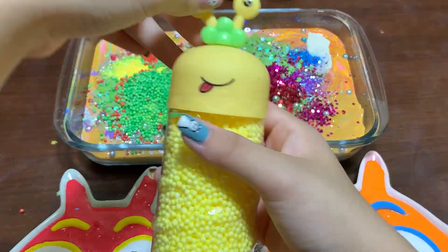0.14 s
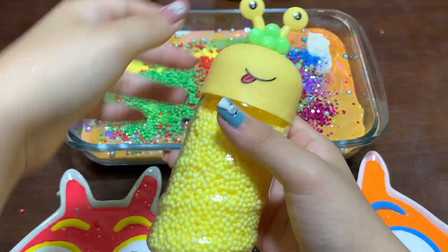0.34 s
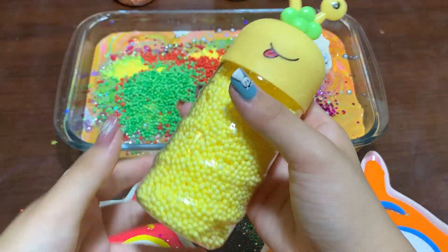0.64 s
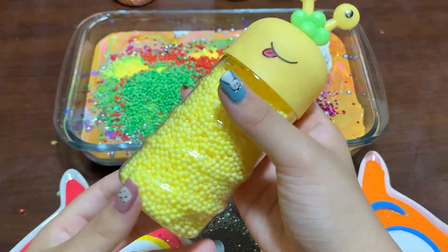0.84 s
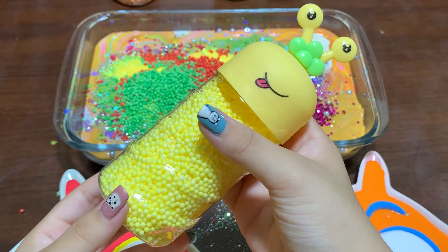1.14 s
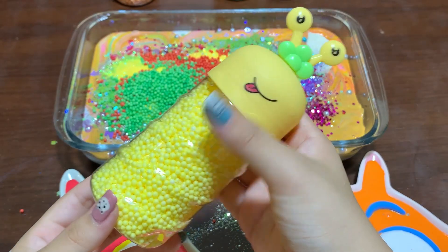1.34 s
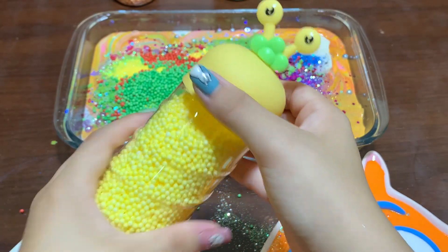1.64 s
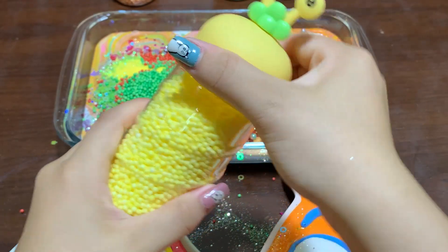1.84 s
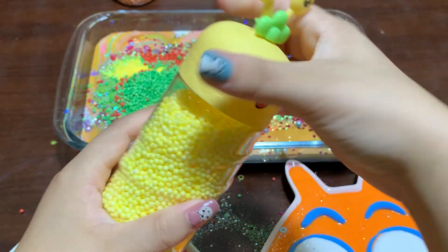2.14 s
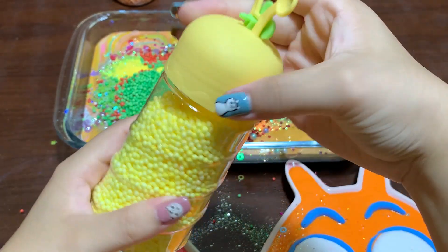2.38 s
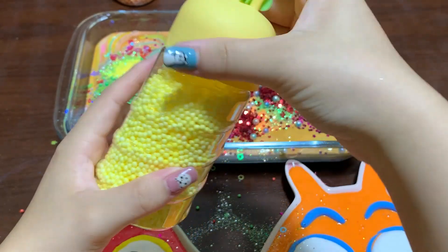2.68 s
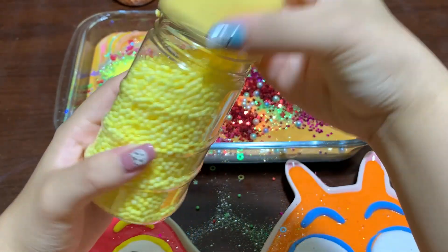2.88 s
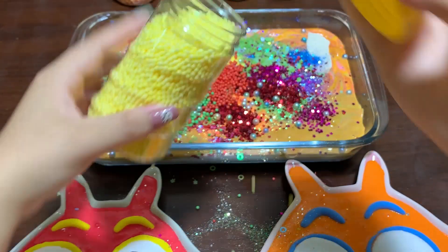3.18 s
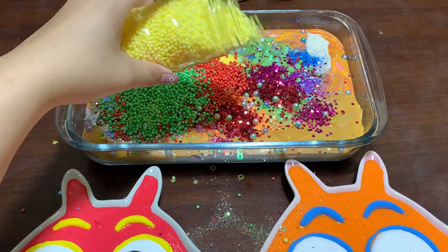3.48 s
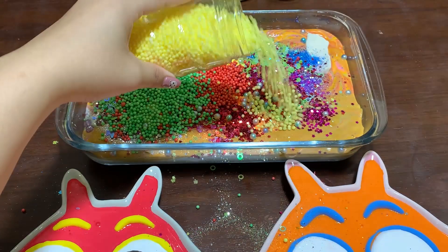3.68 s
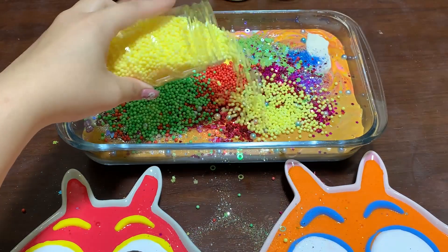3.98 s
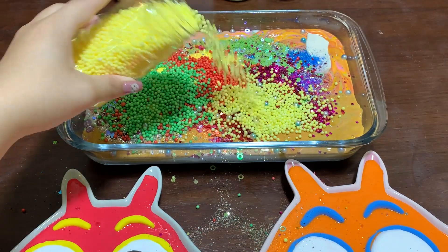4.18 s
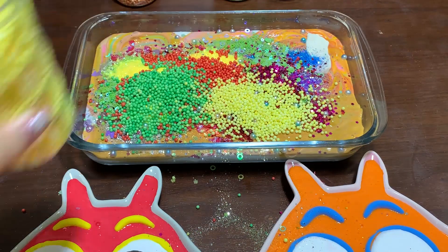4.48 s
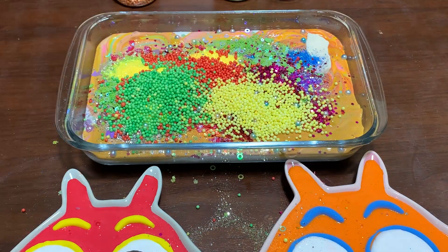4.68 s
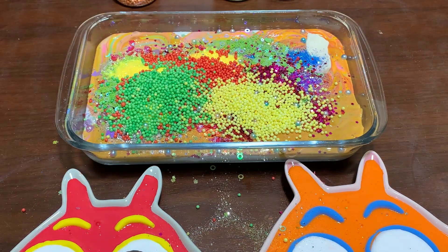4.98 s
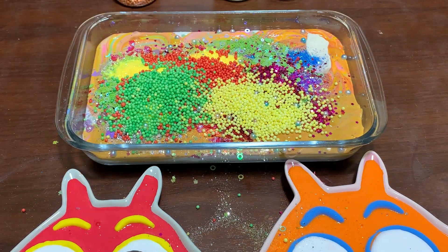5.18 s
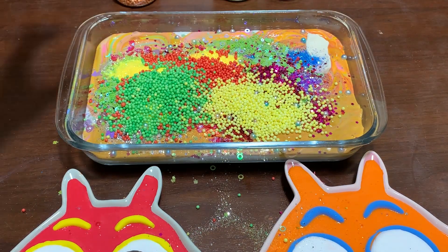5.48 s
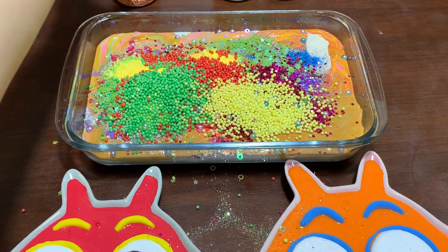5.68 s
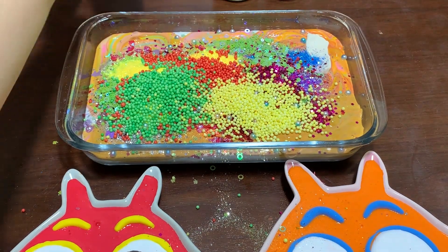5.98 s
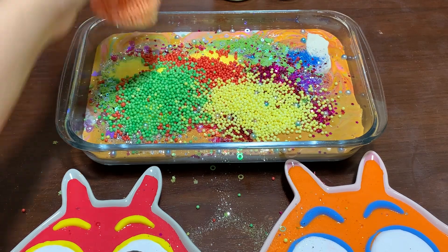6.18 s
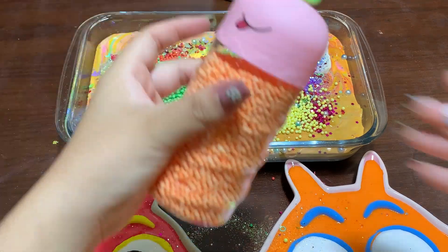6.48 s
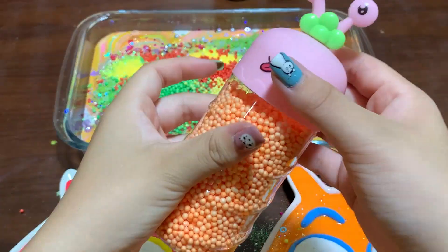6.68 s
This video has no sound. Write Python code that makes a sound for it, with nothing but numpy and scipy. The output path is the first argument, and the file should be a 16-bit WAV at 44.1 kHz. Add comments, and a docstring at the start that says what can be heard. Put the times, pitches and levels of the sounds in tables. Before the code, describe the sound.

A quiet room with a low, steady hum, heard by a close stereo microphone. Faint skin rustle and a soft low air thump come at 0.2 s, with a light nail tick at 0.3. After near silence, a sharp click at 1.8 starts the handling: beads shift and tick, and the cap grinds on the neck in hollow, uneven scrapes with crisp plastic clicks from 2.1 to 3.1. At 3.2 the cap snaps off in a cluster of clicks and a short hollow pop. From 3.65 to 4.3, five evenly spaced finger taps with low air puffs shake out dry, fizzing bead spurts, the patter trickling until 4.8. Between 5.05 and 5.35, bright cracks and short slides hit a table at right, echoing, the last loudest. Soft rustling and dull ticks follow, a second bottle scrapes up at 6.1, and a low air thump sweeps downward at 6.65 before quiet.

```python
"""Hands turn a plastic bottle of foam beads close to a stereo microphone: grains rub and patter in a quiet, humming room.
Moving air thumps as low filtered noise; nails and cap click as noise bursts that ring bottle resonances.
The cap pops off as decaying sines, then finger taps shake out spurts and a stream of beads.
Bottle and cap hit and slide on a table to the right, heard mostly through decaying-noise reverberation.
A second bottle is nudged with dull clicks and dragged up; a last push of air sweeps down in pitch."""
import sys
import numpy as np
from scipy import signal
from scipy.fft import rfft, irfft, next_fast_len
from scipy.io import wavfile
from scipy.ndimage import uniform_filter1d, map_coordinates

SR = 44100
rng = np.random.default_rng(int(sys.argv[2]) if len(sys.argv) > 2 else 0)


def invert_db(x):
    """Field ratio 10**(x/20) for x, a level in decibels (scalar or array-like)."""
    u = np.asarray(x, float) / 20
    return 10 ** u


def persist_wave(psi):
    """Save psi, clipped to +-1, as 16-bit WAV."""
    counts = np.round(np.clip(psi, -1, 1) * 32767).astype(np.int16)
    wavfile.write(sys.argv[1], SR, np.atleast_2d(counts).T)


N = 301203

# fingers on bottle, beads shifting inside: peak_s, rise_s, fall_s, rustle_db, beads_db
BRUSHES = [(0.0, .01, 0.15, -61, -61.5), (0.32, .012, 0.14, -71, -60.5), (0.78, 0.22, .2, -80, -88),
           (1.74, 0.11, 0.083, -68, -64.5), (1.81, .01, 0.074, -63, -72), (1.97, 0.05, .06, -65, -57),
           (2.025, .04, 0.072, -68, -61.5), (2.143, 0.017, 0.23, -54.5, -49),
           (2.19, 0.037, 0.044, -54, -49.5), (2.39, 0.069, 0.042, -66, -44.5),
           (2.51, .015, 0.27, -68, -54.5), (4.948, 0.17, 0.16, -63, -86), (5.769, 0.35, 0.13, -59.5, -63.5),
           (6.531, 0.35, 0.12, -68, -71), (6.75, 0.17, 0.26, -74.5, -79)]
# cap thread grinding on neck, second bottle dragged up: peak_s, rise_s, fall_s, scrape_db, boom_db
TWISTS = [(2.19, 0.014, 0.12, -54, -56), (2.385, 0.15, 0.079, -54, -46), (2.51, 0.031, .2, -51, -43.5),
          (2.6, 0.09, .12, -57, -48), (2.72, .2, 0.046, -62.5, -57.5), (2.83, 0.032, 0.087, -55.5, -55.5),
          (2.92, 0.048, 0.24, -49.5, -44.5), (3.06, .1, 0.11, -57, -48.5), (3.165, 0.094, .2, -54.5, -44),
          (3.64, 0.076, 0.06, -67, -62), (6.123, 0.072, 0.13, -52.5, -54.5)]
# skin rustle spectrum: freq_hz, density_db_per_hz
RUSTLE_SPECTRUM = [(1800, -24.5), (2600, -7), (4300, 4), (6000, -9), (9000, -8), (15300, -39), (16100, -56)]
# bottle air and wall resonances: freq_hz, width_hz, gain_db
BOTTLE_MODES = [(113, 126, -5), (237, 63, 4.5), (378.4, 98, 3.5), (559, 250, -1.5), (1270, 160, -20.5)]
# left-right likeness of near sounds: freq_hz, likeness (-1 to 1)
NEAR_LIKENESS = [(60, 0.97), (150, 1), (380, 0.98), (950, 0.033), (2380, 0.18), (5980, 0.037),
                 (15000, 0.04)]
# finger taps shaking beads out: start_s, click_db, knock_db, spurt_db, boom_db
SHAKES = [(3.655, -31.5, -46, -48, -53), (3.8221, -39, -53.5, -50.5, -63), (3.9844, -39.5, -55, -53, -55.5),
          (4.135, -39, -48, -52, -50.5), (4.29, -42.5, -45.5, -52, -52)]
# steady stream of beads: time_s, patter_db
STREAM = [(3.82, -64), (3.9, -60.5), (4.1, -54), (4.35, -54.5), (4.72, -58.5), (4.79, -54.5), (4.815, -51),
          (4.83, -84.5)]
# bead patter spectrum: freq_hz, density_db_per_hz
PATTER_SPECTRUM = [(700, -77), (1200, -32.5), (1600, -12), (3000, -12), (4500, -8.5), (9500, -2.5),
                   (13000, -4), (15300, -10.5), (16100, -38.5)]
# thinner tone of falling beads than of those in the hand: freq_hz, gain_db
LANDING_TONE = [(1500, -2.5), (3000, -1), (6000, -1), (10000, 0.5), (12000, 2), (15000, 4)]
# quiet room spectrum: freq_hz, density_db_per_hz
QUIET_SPECTRUM = [(15, -55.5), (25, -34), (43, -18.5), (70, -11), (90, -9), (108, -2.5), (150, -20),
                  (330, -24), (480, -28.5), (650, -31.5), (1500, -37.5), (4200, -41), (9500, -44),
                  (15300, -42.5), (16100, -77.5)]
# left-right likeness of far sounds: freq_hz, likeness (-1 to 1)
FAR_LIKENESS = [(60, 0.94), (150, 0.94), (380, 0.73), (950, -0.13), (2380, -0.15), (5980, -0.14),
                (15000, 0.3)]
# air pushed at the microphone: start_s, length_s, level_db
GUSTS = [(0.196, .1, -37), (3.662, 0.063, -34), (3.896, 0.044, -40), (3.965, 0.031, -37.5),
         (4.06, .035, -38), (4.155, .015, -45.5)]
# gust spectrum: freq_hz, density_db_per_hz
GUST_SPECTRUM = [(15, 2), (25, -1), (69, 14), (102, 13), (193, -6.5), (332, -25), (400, -51), (520, -55),
                 (880, -120)]
# one falling push of air: start_s, level_db, first_hz, last_hz, sweep_s
PUSH = (6.6475, -21, 250, 52, .054)
# nail taps and cap clicks on the bottle: start_s, click_db, knock_db, tone_hz
TAPS = [(0.314, -52, -81, 2190), (1.8017, -28.5, -59.5, 4580), (2.0438, -46, -69, 2000),
        (2.1865, -30, -41.5, 4310), (2.349, -34.5, -38, 1190), (2.386, -25, -33.5, 3800),
        (2.4952, -24, -29, 4680), (2.5429, -47, -35, 1430), (2.577, -34, -37, 1480),
        (2.708, -46, -47, 1500), (2.831, -34, -39.5, 1740), (2.864, -26, -35.5, 5500),
        (2.9072, -31.5, -37, 1110), (2.9159, -25.5, -33, 4300), (2.947, -45, -27, 1050),
        (3.068, -45, -39, 1680), (3.1773, -21.5, -24.5, 4160), (3.1868, -18.5, -32.5, 1340),
        (3.1976, -26, -32, 1420), (3.2133, -18.5, -33, 1260), (3.494, -48, -78.5, 4200),
        (4.891, -47.5, -73.5, 4370)]
# click spectrum: freq_hz, density_db_per_hz
CLICK_SPECTRUM = [(400, -18), (700, -14.5), (2000, -8.5), (3000, -12), (4300, -3.5), (5500, -7),
                  (10000, -13.5), (15500, -18.5), (16500, -44.5)]
# cap leaving the neck: start_s, level_db
POP = (3.178, -24)
# rings of neck and cap: freq_hz, relative_db, t60_s
CAP_RINGS = [(397, -0.5, 0.062), (385, -14, 0.5), (1370, -12.5, 0.06), (3860, -17.5, 0.46),
             (4460, -16, .15)]
# blows on the table: start_s, crack_db, thud_db, crack_t60_s, tone_hz
BLOWS = [(5.0528, -25.5, -29.5, 0.022, 1740), (5.0917, -18.5, -35, 0.014, 3300),
         (5.1087, -18, -27, 0.013, 3590), (5.1264, -25.5, -34, 0.0047, 1910),
         (5.1985, -17, -32, 0.0077, 1760), (5.2874, -31.5, -42.5, 0.0059, 1730),
         (5.3312, -9.5, -25, 0.01, 4620)]
# table crack spectrum: freq_hz, density_db_per_hz
CRACK_SPECTRUM = [(710, -21), (1200, 4), (3670, -1.5), (4880, -3), (8550, -7.5), (10500, -8.5),
                  (14800, -15), (16500, -35.5)]
# table top and hollow cap resonances: freq_hz, width_hz, gain_db
TABLE_MODES = [(316, 220, 0.5), (697, 170, 7), (1009, 122, 7.5), (1960, 53, -7.5)]
# bottle and cap sliding on the table: start_s, length_s, level_db
SLIDES = [(5.058, 0.11, -39.5), (5.205, .08, -40.5)]
# sliding spectrum: freq_hz, density_db_per_hz
DRAG_SPECTRUM = [(90, -62.5), (150, -16.5), (350, -0.5), (500, -21), (970, -2.5), (2200, -5.5),
                 (2600, -15.5), (11000, -37.5), (15300, -51), (16100, -69)]
# second bottle nudged: start_s, click_db, knock_db, tone_hz
NUDGES = [(5.6993, -52.5, -82, 2390), (5.839, -53, -77, 2120), (6.0258, -58.5, -70, 2670),
          (6.088, -45.5, -75, 2170), (6.106, -37.5, -66, 1270), (6.1264, -45, -41.5, 700)]
# dull click spectrum: freq_hz, density_db_per_hz
DULL_SPECTRUM = [(300, -22), (700, -2), (2500, 0.5), (4500, -18), (10000, -18), (16500, -50)]
# room decay: freq_hz, t60_s
ROOM_DECAY = [(100, 0.26), (400, 0.58), (2500, 0.71), (6000, 0.57), (14000, 0.49)]
# range over which the treble becomes shared: freq_hz
SHARED_HZ = [6500, 12500]

SWELL_DB = 20  # level change over one rise or fall time
SPURT_LAG_S, SPURT_RISE_S = 0.024, 0.029


def unit(x):
    """Scale to rms 1."""
    return x / np.sqrt(np.mean(x ** 2) + 1e-20)


def along(points, hz):
    """Read (Hz, value) points on a log frequency axis."""
    f, v = np.transpose(points)
    return np.interp(np.log(hz + 1), np.log(f + 1), v)


def wobble(rate_hz):
    """Smooth random curve, rate_hz knots a second."""
    coarse = np.arange(0, N + 64, 64)
    knots = rng.standard_normal(int(N * rate_hz / SR) + 4)
    return np.interp(np.arange(N), coarse, map_coordinates(knots, [coarse * rate_hz / SR]))


def filtered(x, response):
    """Apply a complex frequency response."""
    m = next_fast_len(N + 8192)
    return irfft(rfft(x, m) * response(np.fft.rfftfreq(m, 1 / SR)), m)[..., :N]


def colour(spectrum):
    """Response of a (Hz, dB) spectrum."""
    return lambda hz: invert_db(along(spectrum, hz))


def modes(table):
    """Causal response of damped resonances, signs alternating."""
    def response(hz):
        total = 0
        for k, (centre_hz, width_hz, db) in enumerate(table):
            damping = 1j * hz * width_hz
            total = total + (-1) ** k * invert_db(db) * damping / (centre_hz ** 2 - hz * hz + damping)
        return total
    return response


def grains(rate_hz, spread_db, share):
    """Two streams of tiny contacts of uneven size, mixed with smooth noise."""
    hit = rng.random(N) < rate_hz / SR
    size = hit * invert_db(spread_db * np.minimum(rng.exponential(size=N), 4))
    envelope = signal.lfilter([1], [1, -.92], size)
    return (share * unit(envelope) + 1 - share) * rng.standard_normal((2, N))


def stereo(pair, response, likeness):
    """Colour two streams and mix them as mid and side to the given likeness, rms 1."""
    def split(hz):
        turn = np.arccos(np.clip(along(likeness, hz), -1, 1)) / 2
        return response(hz) * [np.cos(turn), np.sin(turn)]
    mid, side = filtered(pair, split)
    return unit(np.array([mid + side, mid - side]))


def placed(pair, lag_s, pan_db):
    """Place off centre: left later by lag_s and louder by pan_db."""
    half = np.array([[.5], [-.5]])
    return filtered(pair, lambda hz: invert_db(pan_db * half) * np.exp(-2j * np.pi * hz * lag_s * half))


def strokes(peak_s, rise_s, fall_s, db):
    """Gain of strokes that swell to a peak and fade, straight in dB; powers add."""
    column = lambda v: np.reshape(v, (-1, 1))
    t = np.arange(0, N + 32, 32) / SR - column(peak_s)
    rise, fall = np.maximum(column(rise_s), .002), np.maximum(column(fall_s), .002)
    power = invert_db(column(db) - SWELL_DB * np.maximum(-t / rise, t / fall)) ** 2
    return np.interp(np.arange(N), np.arange(t.shape[1]) * 32, np.sqrt(power.sum(0)))


def held(table, rise_s, sag_db_per_s, fall_s):
    """Gain of sounds that set in, sag while they last and let go."""
    t, gain = np.arange(N) / SR, 0
    for start_s, length_s, db in table:
        early = np.clip(start_s - t, 0, 1) / rise_s
        late = np.clip(t - start_s - length_s, 0, 1) / fall_s
        sag_db = sag_db_per_s * np.clip(t - start_s, 0, length_s)
        gain = gain + invert_db(db - SWELL_DB * (early + late) - sag_db)
    return gain


def hits(table, crack, body, rise_s, tone_db, push_s, body_db, lag_s, pan_db):
    """Noise crack with its own tone plus a soft push ringing the body; returns sound and room feed."""
    cracks, pushes = np.zeros((3, N + SR)), np.zeros((3, N + SR))  # left, right, room feed
    t = np.arange(SR // 20) / SR
    for start_s, db, knock_db, crack_s, hz in table:
        noise = rng.standard_normal((4, len(t)))
        first = round(start_s * SR)
        at = slice(first, first + len(t))
        tone = invert_db(tone_db - 60 * t / .016) * np.sin(2 * np.pi * hz * t)
        snap = 1 + 1.1 * invert_db(-60 * t / 0.0039)  # first contact is hardest
        decay = invert_db(db + 5.5 - 60 * t / max(crack_s, .002)) * (1 - np.exp(-t / rise_s))
        burst = decay * (tone + snap * (noise[0] + 1.1 * noise[1:3]))
        cracks[:2, at] += burst
        cracks[2, first] += np.linalg.norm(burst[0])  # one pulse: no ringing bands in the tail
        push = invert_db(knock_db + body_db - 60 * t / push_s) * (1 - np.exp(-t / 0.0012))
        push = push * (0.99 + 1.62 * noise[3])
        pushes[:2, at] += push
        pushes[2, first] += np.linalg.norm(push)
    # small bodies radiate no deep bass
    radiated = lambda hz: modes(body)(hz) * (1j * hz / (110 + 1j * hz)) ** 2
    sound = filtered(cracks[:, :N], colour(crack)) + filtered(pushes[:, :N], radiated)
    return placed(sound[:2], lag_s, pan_db), sound[2]


def rubbing():
    """Skin and thread catch in clumps: bright rustle, scrape, and the hollow bottle booming."""
    *brush, rustle_db, _ = np.transpose(BRUSHES)
    *twist, scrape_db, boom_db = np.transpose(TWISTS)
    skin, thread = strokes(*brush, rustle_db), strokes(*twist, scrape_db)
    catch = wobble(41)
    band = lambda hz: 1j * hz * 1700 / (1500 ** 2 - hz * hz + 1j * hz * 1700)
    rustle = stereo(grains(900, 6.8, 0.19), colour(RUSTLE_SPECTRUM), NEAR_LIKENESS)
    scrape = stereo(grains(500, 6.4, 0.28), lambda hz: band(hz) ** 2, NEAR_LIKENESS)
    boom = stereo(grains(150, 1.2, 0.43), modes(BOTTLE_MODES), NEAR_LIKENESS)
    return ((skin + invert_db(-2.5) * thread) * invert_db(0.53 * catch) * rustle
            + (invert_db(-5.5) * skin + thread) * invert_db(1.8 * catch) * scrape
            + strokes(*twist, boom_db) * invert_db(4.2 * wobble(40)) * boom)


def beads():
    """Light beads tick together, shifting in the hand or running out; those inside drum on the bottle."""
    start_s, _, _, spurt_db, boom_db = np.transpose(SHAKES)
    *brush, _, shift_db = np.transpose(BRUSHES)
    *twist, scrape_db, _ = np.transpose(TWISTS)
    stream_s, stream_db = np.transpose(STREAM)
    stream = invert_db(np.interp(np.arange(N) / SR, stream_s, stream_db, -150, -150))
    falling = stream + strokes(start_s + SPURT_LAG_S, SPURT_RISE_S, .13, spurt_db)
    shifting = strokes(*brush, shift_db) + strokes(*twist, scrape_db - 3.5)
    drumming = strokes(start_s + SPURT_LAG_S, SPURT_RISE_S, 0.1, boom_db)
    fizz = stereo(grains(1600, 3.3, .42), colour(PATTER_SPECTRUM), NEAR_LIKENESS)
    landing = invert_db(1.5 * wobble(8.01)) * filtered(fizz, colour(LANDING_TONE))
    boom = stereo(grains(310, 3.5, 0.091), modes(BOTTLE_MODES[2:]), NEAR_LIKENESS)
    return (invert_db(1.6 * wobble(30)) * (shifting * fizz + falling * landing)
            + drumming * invert_db(3.2 * wobble(49)) * boom)


def quiet_room():
    """Steady low-heavy noise, its level drifting slightly."""
    noise = stereo(rng.standard_normal((2, N)), colour(QUIET_SPECTRUM), FAR_LIKENESS)
    return invert_db(-62.5 + 0.43 * wobble(8.1)) * noise


def room(x):
    """Reverberation: a new noise tail each half second, each frequency dying at its own speed."""
    out, step = np.zeros((2, N + 2 * SR)), SR // 2
    for start in range(0, N, step):
        hz, t, z = signal.stft(rng.standard_normal((2, SR * 3 // 4)), SR, nperseg=256)
        decay = invert_db(-60 * t / along(ROOM_DECAY, hz)[:, None])
        tail = signal.istft(z * decay, SR, nperseg=256)[1]
        wet = signal.fftconvolve(x[None, start:start + step], tail / np.linalg.norm(tail[0]), axes=1)
        out[:, start + 250:start + 250 + wet.shape[1]] += wet
    return out[:, :N]


def air():
    """Turbulent gusts, almost alike in both channels; one push sweeps down in pitch."""
    swirl = stereo(rng.standard_normal((2, N)), colour(GUST_SPECTRUM), [(60, .85)])
    power = np.abs(uniform_filter1d(np.mean(swirl ** 2, axis=0), size=1300))
    swirl = swirl / np.sqrt(power + .05)  # steadier strength, random pitch
    gusts = held(GUSTS, rise_s=0.02, sag_db_per_s=85, fall_s=0.017) * swirl
    start_s, db, first_hz, last_hz, sweep_s = PUSH
    u = np.clip((np.arange(N) / SR - start_s) / sweep_s, 0, 2)
    hz = (u > 0) / ((1 - u) / first_hz + u / last_hz)  # period grows evenly
    envelope = invert_db(db) * (1 - np.exp(-u / .02)) * np.exp(-((u - .34) / .36) ** 2)
    push = -envelope * np.sin(2 * np.pi * np.cumsum(hz) / SR)
    return gusts + placed(np.array([push, push]), lag_s=0.00047, pan_db=0)


def bottle_taps():
    """Finger and cap hits on the bottle; the harder the knock, the longer the click rattles."""
    contacts = []
    for start_s, db, knock_db, hz in TAPS:
        click_s = 0.012 + 0.033 * invert_db(knock_db + 26)  # t60
        contacts.append((start_s, db, knock_db, click_s, hz))
    for start_s, db, knock_db, _, _ in SHAKES:
        contacts.append((start_s, db, knock_db, 0.038, 1525))
    return hits(contacts, CLICK_SPECTRUM, BOTTLE_MODES, rise_s=0.00099, tone_db=6, push_s=0.02,
                body_db=18.0, lag_s=-0.000095, pan_db=0.5)


def cap_off():
    """The cap leaves the neck: the air column pops and the cap rings on unsteadily."""
    start_s, db = POP
    out, t = np.zeros(N), np.arange(SR // 2) / SR
    for hz, relative_db, t60_s in CAP_RINGS:
        drift = hz / 1500 * wobble(120)[:len(t)]  # phase wander blurs high rings
        flutter_db = min(hz / 1000, 3.8) * wobble(40)[:len(t)]
        level = invert_db(db + relative_db - 60 * t / t60_s + flutter_db)
        out[round(start_s * SR):][:len(t)] += level * np.sin(2 * np.pi * hz * t + drift)
    return out


def table_blows():
    """Bottle and cap strike the table: bright cracks, and thuds ringing the top and the hollow cap."""
    return hits(BLOWS, CRACK_SPECTRUM, TABLE_MODES, rise_s=0.0018, tone_db=7, push_s=0.025,
                body_db=15.5, lag_s=0.0002, pan_db=-2.0)


def sliding():
    """Bottle and cap drag on the table: uneven coloured grains."""
    drag = stereo(grains(300, 3.5, .55), colour(DRAG_SPECTRUM), FAR_LIKENESS)
    return held(SLIDES, rise_s=0.015, sag_db_per_s=40, fall_s=0.11) * invert_db(2 * wobble(35)) * drag


def bounced(pair, count, spread_s, db):
    """Add weak early copies from the table top and the things standing on it."""
    echo = np.zeros((2, SR // 10))
    echo[:, 0] = 1
    at_s = rng.uniform(.003, spread_s, (2, count))
    sign = rng.choice([-1, 1], at_s.shape)
    echo[[[0], [1]], (at_s * SR).astype(int)] = invert_db(db - 8 * at_s / spread_s) * sign
    return signal.fftconvolve(pair, echo, axes=1)[:, :N]


def second_bottle():
    """The second bottle nudged, farther off: duller clicks ringing the bottle resonances."""
    contacts = [(start_s, db, knock_db, 0.019, hz) for start_s, db, knock_db, hz in NUDGES]  # 0.019 s t60
    return hits(contacts, DULL_SPECTRUM, BOTTLE_MODES, rise_s=0.0021, tone_db=10.5, push_s=0.022,
                body_db=17.5, lag_s=0.0001, pan_db=3.0)


def scene():
    """Near sounds are nearly dry; the table is farther off to the right, mostly heard through the room."""
    near = rubbing() + beads() + cap_off()
    taps, tap_feed = bottle_taps()
    blows, blow_feed = table_blows()
    slide = sliding()
    nudges, nudge_feed = second_bottle()
    table = bounced(blows + slide, count=12, spread_s=0.055, db=-10.5) * invert_db([[-.8], [.8]])
    sent = invert_db(-11.5) * near[0] + invert_db(-10.5) * tap_feed + nudge_feed
    sent = sent + invert_db(3.0) * blow_feed + invert_db(1.0) * slide[0]
    return near + taps + nudges + table + room(sent) + quiet_room() + air()


def roll_off(x):
    """The treble ends steeply here."""
    return signal.sosfilt(signal.butter(12, 16810, fs=SR, output="sos"), x)


def record(dry):
    """Share the high treble: left carries a slightly late copy of right."""
    late_s = 12 / SR

    def blend(hz):
        share = np.pi / 2 * np.interp(hz, SHARED_HZ, [0, .88])
        return np.array([np.cos(share), np.sin(share) * np.exp(-2j * np.pi * hz * late_s)])
    left = filtered(dry, blend).sum(0)
    return roll_off(np.array([left, dry[1]]))


dry = scene()
out = record(dry)
persist_wave(out)
```